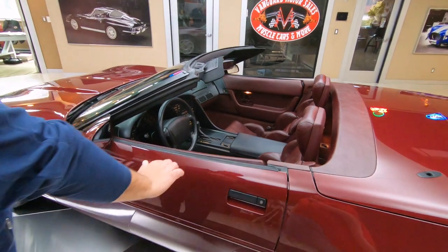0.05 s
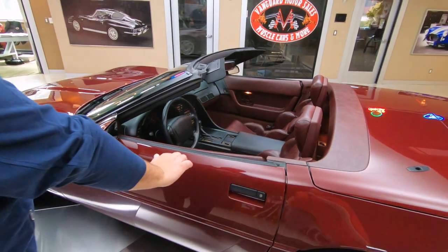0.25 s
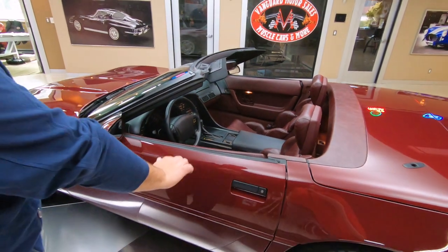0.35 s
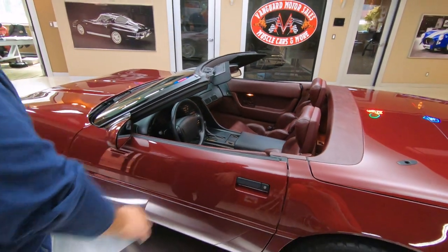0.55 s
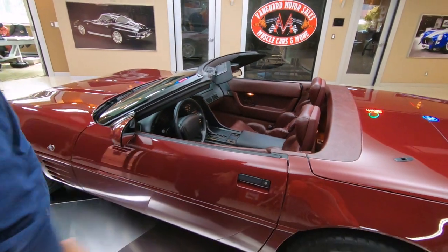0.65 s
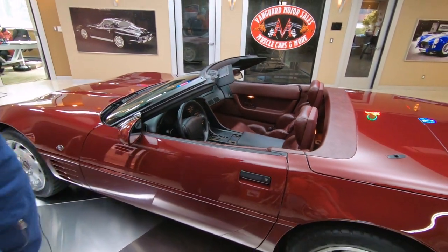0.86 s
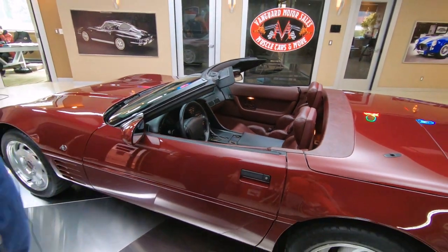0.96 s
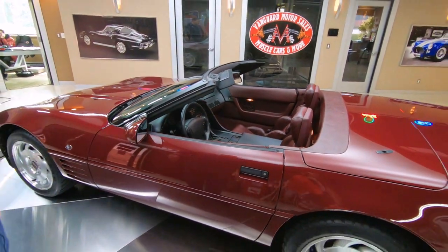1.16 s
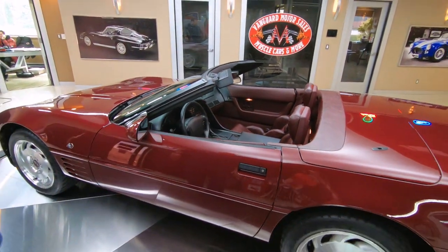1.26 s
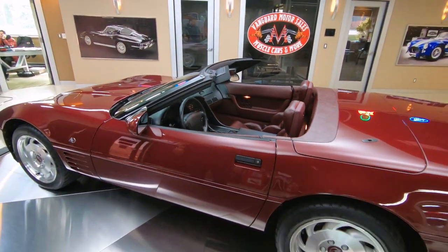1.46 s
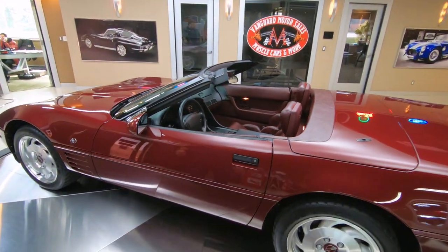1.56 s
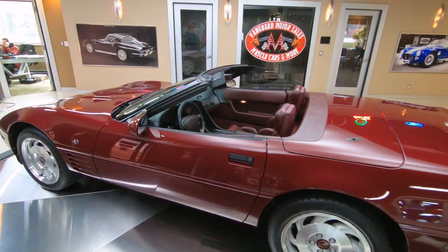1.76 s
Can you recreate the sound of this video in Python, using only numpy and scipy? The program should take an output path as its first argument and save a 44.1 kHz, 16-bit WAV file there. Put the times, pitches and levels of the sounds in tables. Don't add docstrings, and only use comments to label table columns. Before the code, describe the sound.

A car door shuts once, close to the microphone: a bright metallic latch rattle and a short, boomy thunk, followed by a diffuse hall tail, then faint shoe and trim ticks over quiet ventilation hum.

```python
import sys
import numpy as np
from scipy import signal
from scipy.fft import rfft, irfft, next_fast_len
from scipy.io import wavfile
from scipy.ndimage import uniform_filter1d, map_coordinates

SR = 44100
rng = np.random.default_rng(int(sys.argv[2]) if len(sys.argv) > 2 else 0)


def wav_out(sig):
    wavfile.write(sys.argv[1], SR, np.round(np.clip(np.atleast_2d(sig).T, -1, 1) * 32767).astype(np.int16))


def gain_from_db(level_db):
    decades = np.asarray(level_db, float) / 20
    return 10 ** decades


N = 79380
GRIT_DB = 2.5


def unit(x):
    return x / np.sqrt(np.mean(x ** 2) + 1e-20)


def along(points, hz):
    f, value = np.transpose(points)
    return np.interp(np.log(hz + 1), np.log(f + 1), value)


def wobble(rate):
    return map_coordinates(rng.standard_normal(200), [np.arange(N) * rate / SR])


def filtered(x, response):
    size = next_fast_len(len(x) + SR // 4)
    spectrum = rfft(x, size) * response(np.fft.rfftfreq(size, 1 / SR))
    return irfft(spectrum, size)[:len(x)]


def resonance(f, centre_hz, width_hz):
    return 1j * f * width_hz / (centre_hz ** 2 - f * f + 1j * f * width_hz)


def add(track, start_s, sound):
    part = track[round(start_s * SR):][:len(sound)]
    part += sound[:len(part)]


def burst(response, length_s, grit_db):
    t = np.arange(SR // 8) / SR
    grains = np.repeat(rng.standard_normal(len(t) // 20 + 1), 20)[:len(t)]
    noise = rng.standard_normal(len(t)) * gain_from_db(grit_db * grains)
    attack = 1 - np.exp(-t / .0002)
    return .5 * unit(filtered(noise, response)) * gain_from_db(-20 * t / length_s) * attack


def band_burst(centre_hz, width_hz, length_s, grit_db):
    return burst(lambda f: resonance(f, centre_hz, width_hz) ** 2, length_s, grit_db)


def ringing(modes, length_s):
    t = np.arange(round(length_s * SR)) / SR
    return sum(gain_from_db(db - 60 * t / t60) * np.sin(2 * np.pi * hz * t) for hz, db, t60 in modes)


def latch():
    # start in seconds, peak level in dB, rattle length in seconds, tilt in dB per octave.
    contacts = [(0.1872, -26.5, 0.022, -4.5), (0.199, -23.5, 0.021, -3), (.204, -7, 0.0084, -1.5),
                (0.2101, -12, .011, -2.5), (.214, -11.5, .014, -2), (0.224, -18.5, 0.02, -6.5),
                (.233, -17.5, .005, -3), (.238, -17.5, 0.009, 0), (0.2429, -7.5, 0.033, -9.5),
                (0.2487, -17, .006, 0.5), (0.257, -14.5, 0.035, -7.5), (0.269, -22, .005, 2)]
    # centre in Hz, width in Hz, level in dB.
    steel = [(1020, 55, -6.5), (3010, 310, -3), (4630, 130, -7.5), (5450, 300, -7), (6050, 760, -10),
             (8000, 2500, -17.5)]
    # frequency in Hz, density in dB per Hz.
    scrape = [(180, -14), (300, -3), (1120, -9), (2170, -7), (4670, -5), (5610, -14), (8360, -19),
              (16000, -34)]
    steel_share = .4

    def colour(f):
        rings = sum(gain_from_db(db) * resonance(f, centre, width) for centre, width, db in steel)
        return steel_share * rings + gain_from_db(along(scrape, f))

    out = np.zeros(N)
    for start_s, db, length_s, tilt_db in contacts:
        tilted = lambda f: colour(f) * gain_from_db(tilt_db * np.log2(f / 3000 + .05))
        add(out, start_s, gain_from_db(db) * burst(tilted, length_s, GRIT_DB))
    late_click = burst(lambda f: resonance(f, 6000, 14000), .004, GRIT_DB)
    add(out, .3295, gain_from_db(-33) * late_click)
    return out


def shell():
    # start in seconds, peak level in dB, softness in seconds, signed direction.
    blows = [
        (0.185, -42, 0.000296, 0.77),
        (0.2052, -21, 0.000067, -1.22),
        (0.2201, -21, 0.00021, 1),
        (.234, -18, 0.00026, -0.75),
        (.238, -11, 0.00024, 0.94),
        (0.2421, -14, 0.00033, -0.92),
        (.246, -21, 0.00047, 0.84),
        (0.251, -19, 0.00017, -0.7),
    ]
    # frequency in Hz, level in dB, t60 in seconds.
    body_modes = [(62, -7, 0.067), (78, -23, 0.1135), (102.5, -10, 0.62), (120, 3, .05), (142, -16, 0.61),
                  (178.5, -4.5, 0.36), (261.7, -8.5, 0.23), (328.2, -20, 0.049), (438.3, -6, 0.15),
                  (497, 7.5, 0.041), (625, -8.5, 0.059), (1070, -6, .04), (1350, -4, 0.06),
                  (1630, -2.5, .04)]
    # frequency in Hz, level in dB, t60 in seconds.
    whump = [(70, 0, .12)]
    # start in seconds, peak level in dB, centre in Hz, width in Hz,
    # length in seconds.
    seating = [
        (.237, -19, 1282, 1403, 0.021),
        (0.247, -21.5, 1480, 1597, 0.035),
    ]

    force, t = np.zeros(N), np.arange(SR // 50) / SR
    for start_s, db, soft_s, direction in blows:
        push = t * np.exp(-t / soft_s)
        add(force, start_s, direction * gain_from_db(db) * push / push.sum())
    out = signal.fftconvolve(force, .5 * ringing(body_modes, .5))[:N]
    add(out, .207, -gain_from_db(-20) * ringing(whump, .3))
    for start_s, db, centre_hz, width_hz, length_s in seating:
        add(out, start_s, gain_from_db(db) * band_burst(centre_hz, width_hz, length_s, GRIT_DB))
    return out


def low_cut(f):
    cut_hz, damping = 58, 1.254
    return -f * f / (cut_hz ** 2 - f * f + 1j * f * cut_hz * damping)


def hall(x):
    # frequency in Hz, t60 in seconds.
    decay = [(60, 0.72), (250, 0.76), (1000, 0.85), (3000, 0.81), (6000, 0.53), (10000, .33), (15000, 0.17)]
    # frequency in Hz, level in dB.
    tone = [(60, 2.5), (150, -2.5), (500, -0.5), (1500, 3), (5000, -2), (10000, -3), (15000, -1.5)]
    build_s = 0.008

    hz, t, z = signal.stft(x, SR, nperseg=512, noverlap=384)
    energy = uniform_filter1d(abs(z) ** 2, size=3, axis=0)
    build_up = 1 - np.exp(-(t / build_s) ** 2)
    fall = gain_from_db(-120 * t / along(decay, hz)[:, None]) * build_up
    fall *= gain_from_db(2 * along(tone, hz))[:, None] / fall.sum(axis=1)[:, None]
    late = abs(signal.fftconvolve(energy, fall, axes=1)[:, :len(t)])
    noise = signal.stft(rng.standard_normal(N), SR, nperseg=512, noverlap=384)[2]
    noise = noise / np.sqrt(np.mean(abs(noise) ** 2))
    return signal.istft(np.sqrt(late) * noise, SR, nperseg=512, noverlap=384)[1][:N]


def pops():
    # start in seconds, peak level in dB, direction, swing in Hz, edge level in dB.
    slips = [
        (.8195, -33, 1, 75, -20),
        (1.0297, -29, -1, 90, -17),
        (1.5692, -26, 1, 66, -25),
        (1.7003, -25, -1, 80, -22),
    ]
    rise_s, damping = .0005, .58

    out, t = np.zeros(N), np.arange(SR // 10) / SR
    for start_s, db, direction, hz, edge_db in slips:
        w = 2 * np.pi * hz
        swing = np.exp(-damping * w * t) * np.cos(w * t)
        swing -= (1 - gain_from_db(edge_db)) * np.exp(-t / rise_s)
        add(out, start_s, direction * gain_from_db(db) * swing / swing.max())
    return out


def ticks():
    # start in seconds, peak level in dB, centre in Hz, width in Hz, length in seconds.
    scuffs = [(0.151, -67, 1350, 610, 0.017), (0.159, -59, 600, 695, 0.026),
              (.8268, -50.5, 5350, 793, 0.0041), (0.856, -49.5, 1200, 2880, 0.022),
              (.856, -54.5, 3000, 3000, 0.0096), (0.875, -60, 3000, 6070, 0.0041),
              (.952, -62, 5500, 3000, 0.0047), (1.157, -54.5, 1500, 3500, 0.031),
              (0.962, -62, 1200, 2500, 0.14), (1.2745, -52.5, 1200, 2830, 0.016),
              (1.031, -48.5, 1300, 1500, 0.0086), (1.426, -56, 4140, 4520, 0.019),
              (1.429, -60, 990, 1560, 0.042), (1.569, -62, 2000, 3000, 0.036),
              (1.633, -63, 3500, 5000, .02), (1.701, -59, 3960, 8000, .03)]
    # frequency in Hz, level in dB, t60 in seconds.
    trim = [(488, 3.5, 0.015), (737, 1, 0.017), (1170, -4, 0.024), (1576, -7, 0.014), (2500, -15, .015),
            (3500, -18, 0.014)]

    out = np.zeros(N)
    for start_s, db, centre_hz, width_hz, length_s in scuffs:
        add(out, start_s, gain_from_db(db) * band_burst(centre_hz, width_hz, length_s, grit_db=3))
    add(out, .8555, gain_from_db(-40.5) * ringing(trim, .1))
    return out


def air():
    # time in seconds, level in dB.
    hum_level = [(0.0, -51), (0.114, -50.5), (0.344, -50.5), (0.966, -50.5), (1.128, -50), (1.8, -48.5)]
    # frequency in Hz, density in dB per Hz.
    hiss_tone = [(70, -23), (130, -4), (210, -5.5), (330, -10), (500, -18.5), (800, -21), (2000, -34),
                 (7000, -42)]
    hum_hz, wander_hz, wobble_db, patchy_db = 59.5, 1, 0.1, -0.5

    time_s, level_db = np.transpose(hum_level)
    phase = 2 * np.pi * np.cumsum(hum_hz + wander_hz * wobble(6)) / SR
    hum_db = np.interp(np.arange(N) / SR, time_s, level_db) + wobble_db * wobble(10)
    hum = np.sqrt(2) * gain_from_db(hum_db) * np.sin(phase)

    z = signal.stft(rng.standard_normal(N + 512), nperseg=512)[2]
    patches = uniform_filter1d(rng.standard_normal(z.shape), 6, 0)
    patches = unit(uniform_filter1d(patches, 10, 1))
    hiss = signal.istft(z * gain_from_db(patchy_db * patches), nperseg=512)[1][:N]
    hiss = unit(filtered(hiss, lambda f: gain_from_db(along(hiss_tone, f))))

    rumble = unit(filtered(rng.standard_normal(N), lambda f: resonance(f, 52, 41) ** 2))
    return hum + gain_from_db(-59) * hiss + gain_from_db(-65) * rumble


def scene():
    door = filtered(latch() + shell(), lambda f: low_cut(f) ** 2)
    small = ticks()
    answer = hall(gain_from_db(-7.5) * door + gain_from_db(-4) * small)
    return (door + answer + small + pops() + air())[None]


def low_pass(x):
    return signal.sosfilt(signal.butter(12, 16440, fs=SR, output="sos"), x)


def record(dry):
    mix = filtered(dry[0], lambda f: f < 15900)[None]
    return low_pass(mix)


dry = scene()
out = record(dry)
wav_out(out)
```